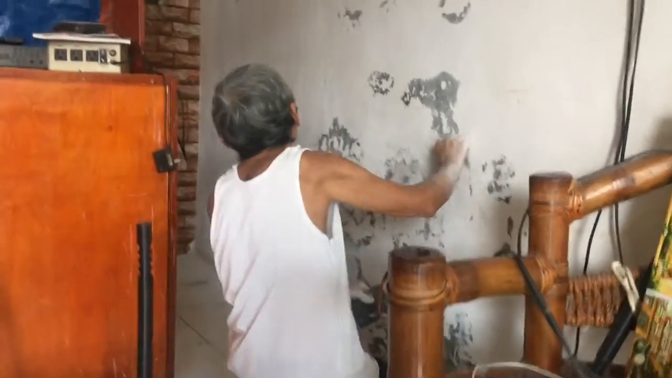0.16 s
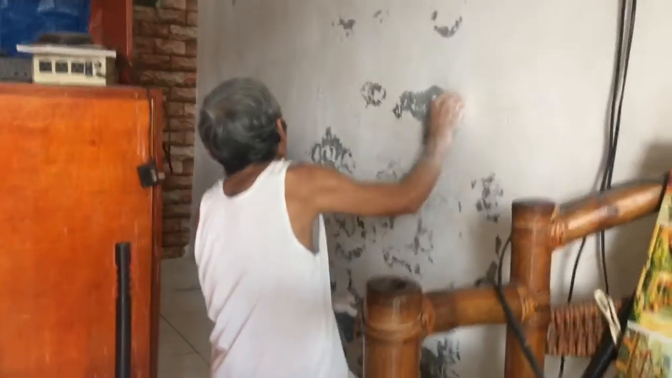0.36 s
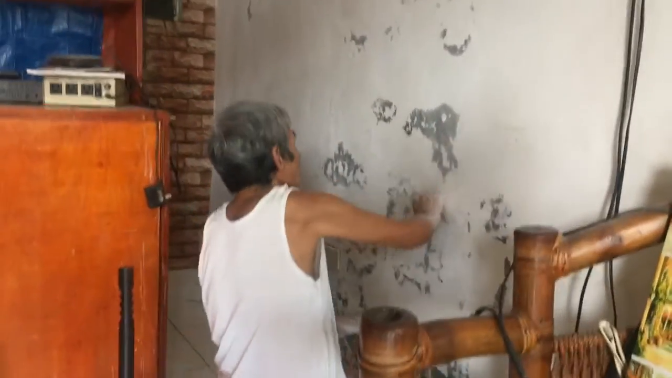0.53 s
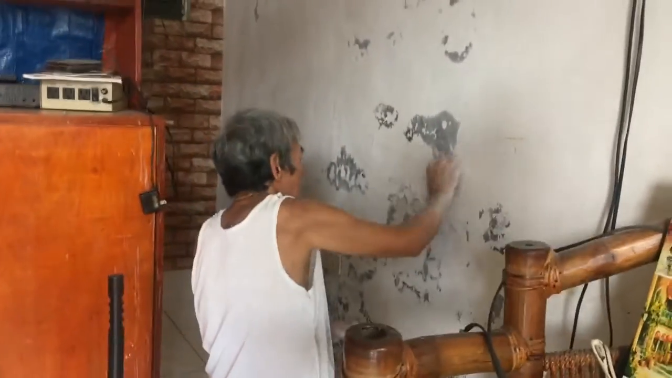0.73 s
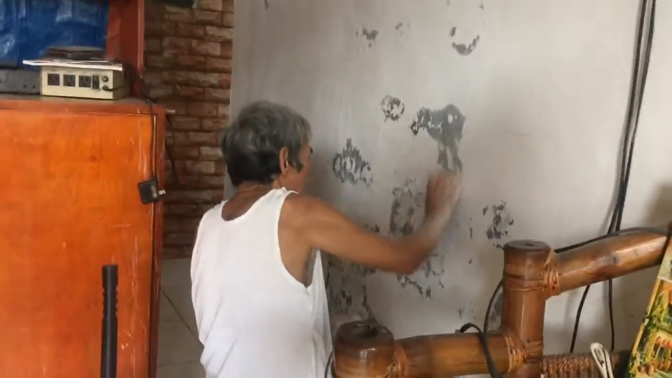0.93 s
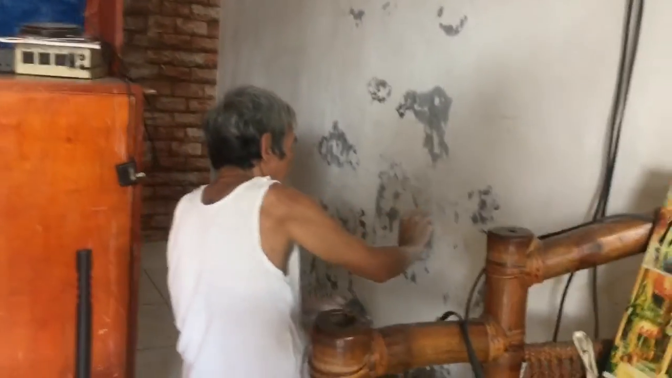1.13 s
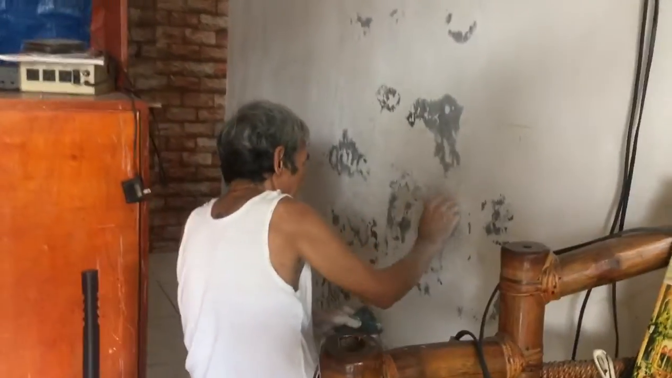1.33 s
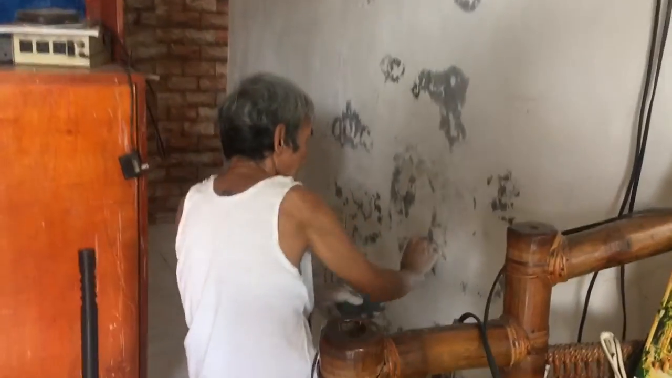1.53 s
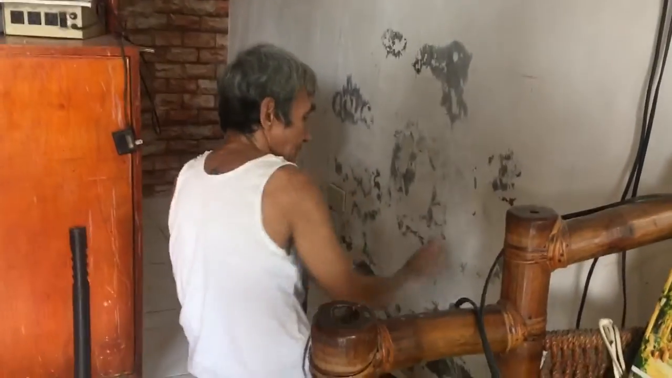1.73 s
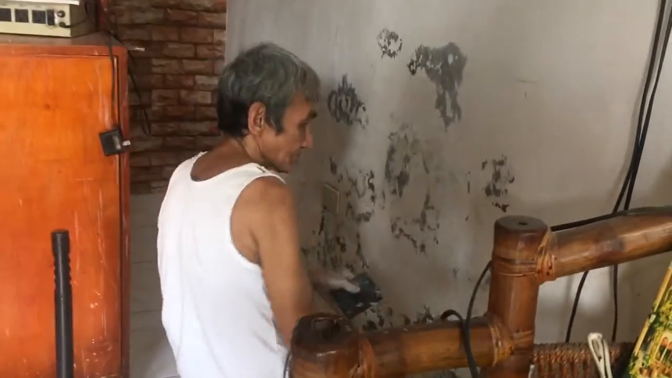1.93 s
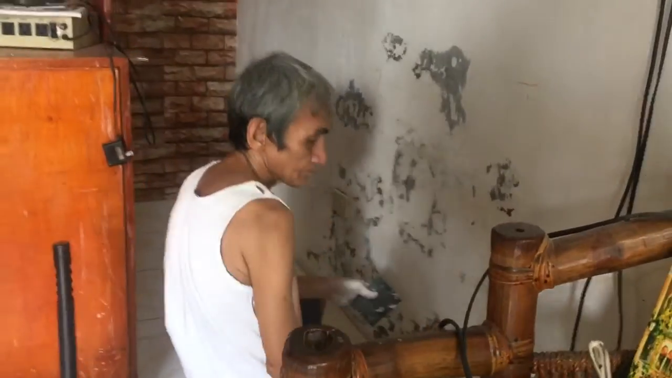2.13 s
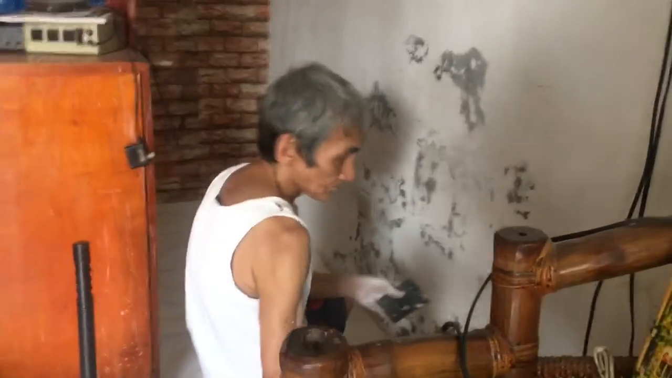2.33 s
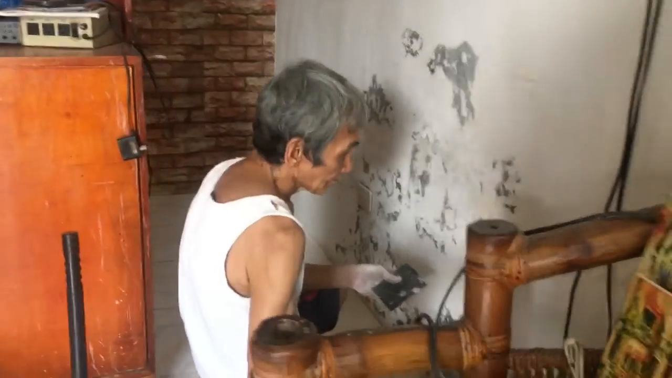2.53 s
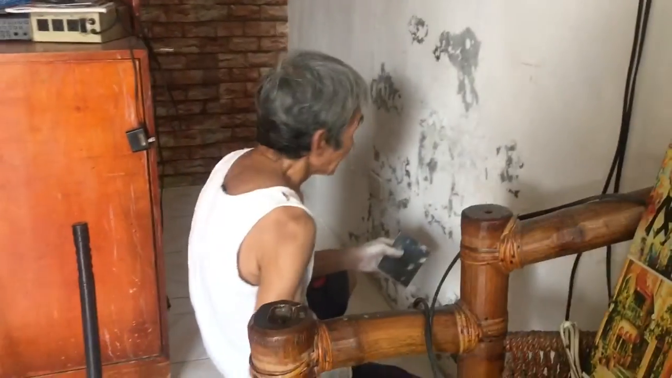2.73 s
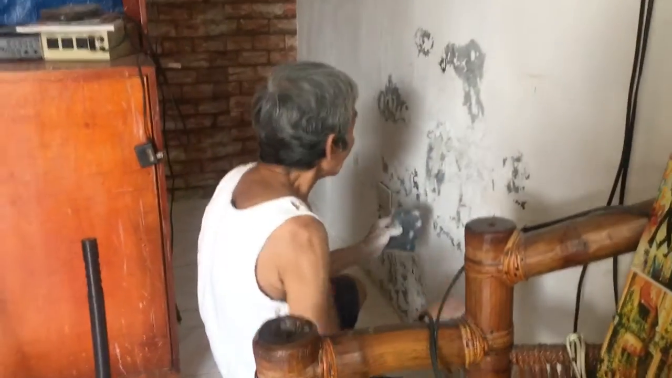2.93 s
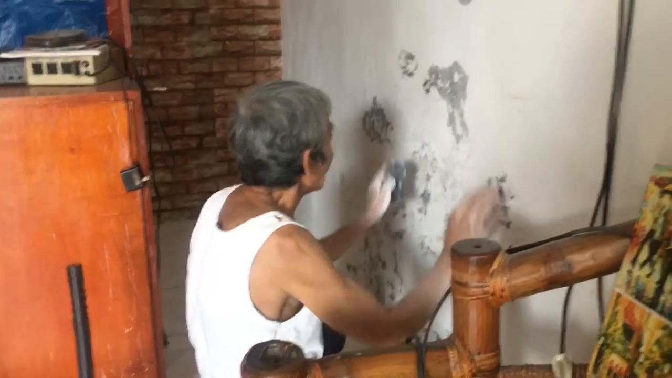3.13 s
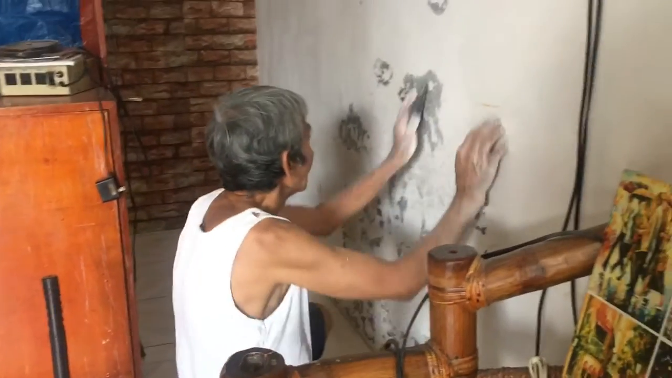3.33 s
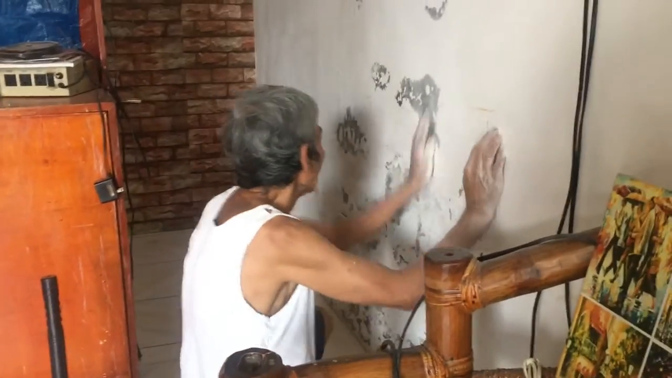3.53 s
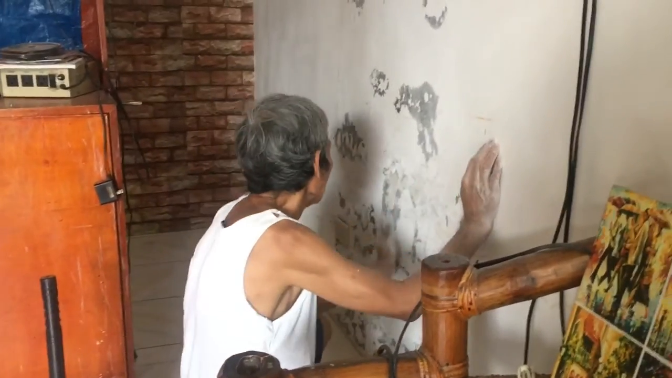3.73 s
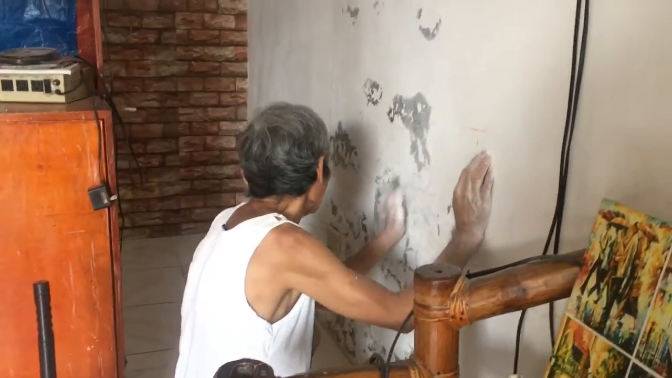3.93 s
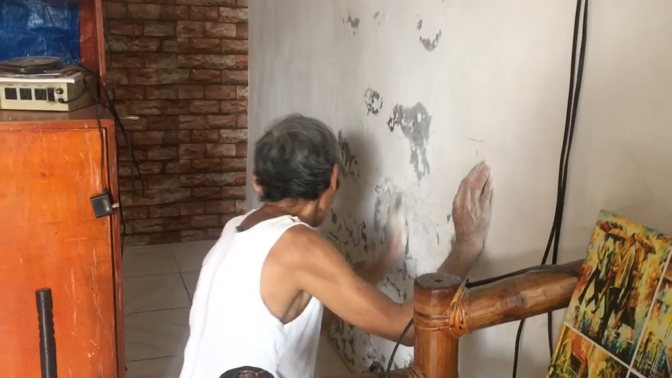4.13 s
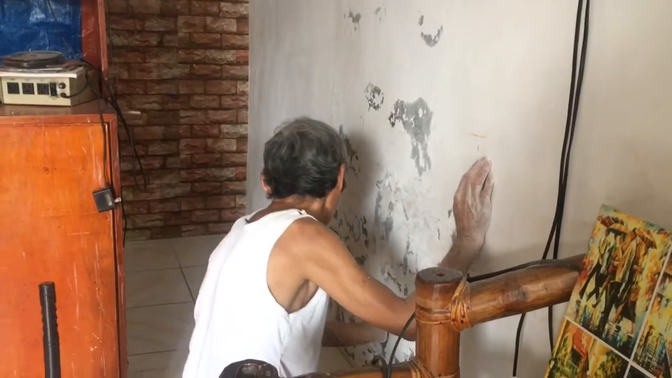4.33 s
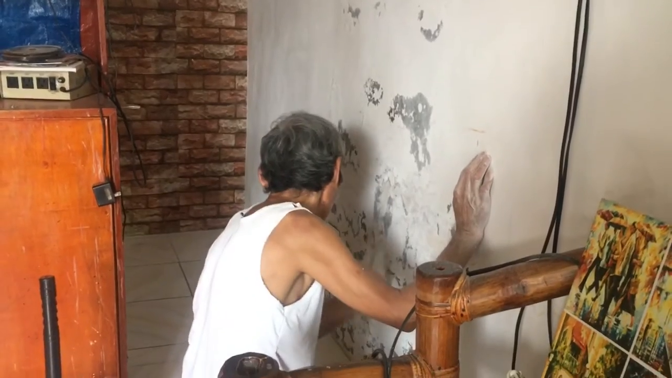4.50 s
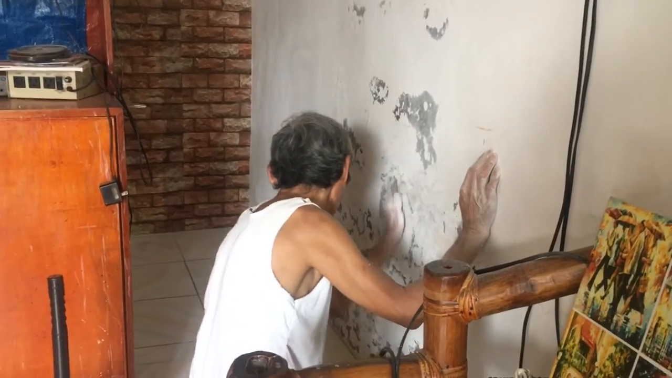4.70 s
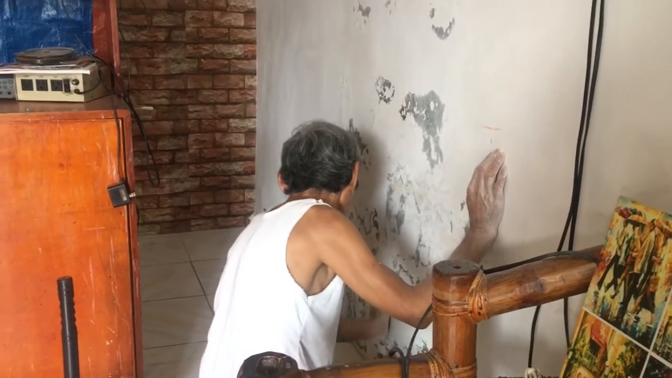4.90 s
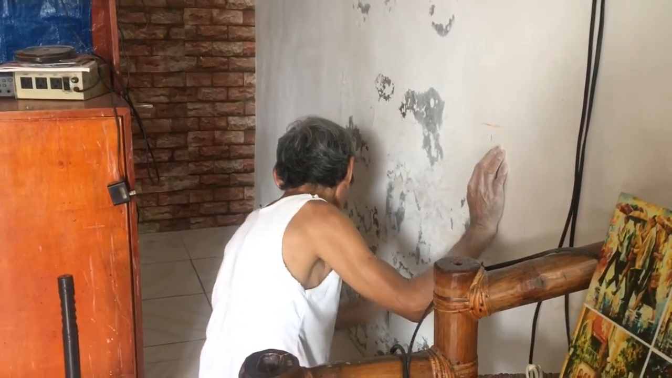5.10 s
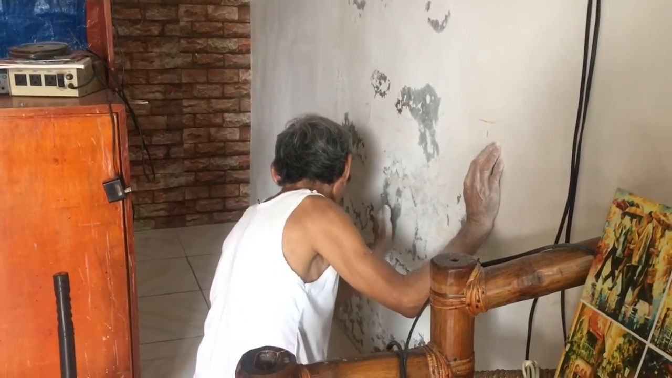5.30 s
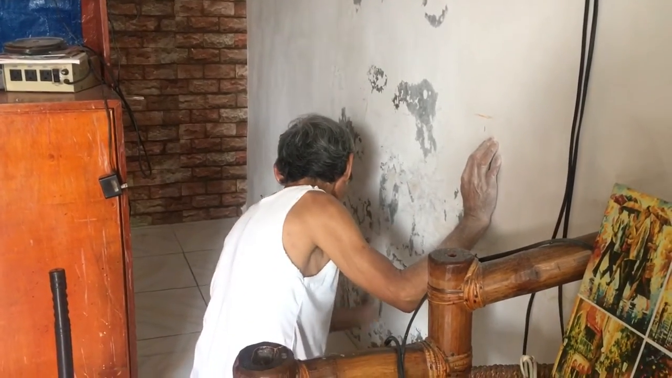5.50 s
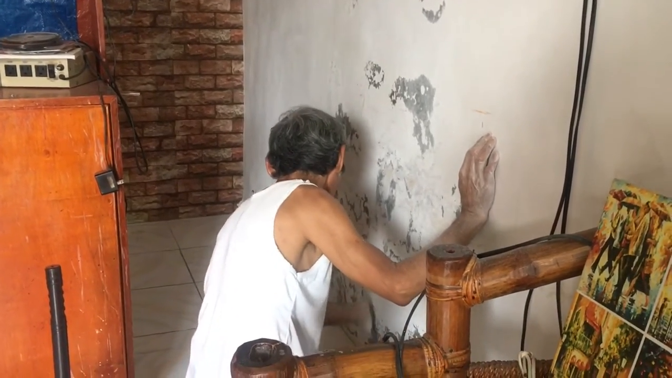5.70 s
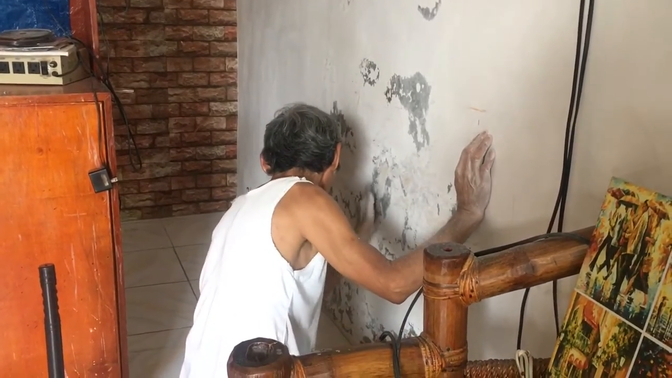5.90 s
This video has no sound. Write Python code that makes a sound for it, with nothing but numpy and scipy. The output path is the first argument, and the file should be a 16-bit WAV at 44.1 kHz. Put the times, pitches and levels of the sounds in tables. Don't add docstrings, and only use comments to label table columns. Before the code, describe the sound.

Short papery scrapes and dry flake snaps come first, with hollow drumming from the wall. After about a second and a half they stop, leaving low street wash and hum, a crinkle, then a metallic clink and scraping jangle. Forceful, hissing back-and-forth sanding follows, close to a mono phone whose gain control ducks slightly, in a lightly reverberant room.

```python
import sys
import numpy as np
from scipy import signal
from scipy.fft import rfft, irfft
from scipy.io import wavfile
from scipy.ndimage import uniform_filter1d

SR = 44100
rng = np.random.default_rng(int(sys.argv[2]) if len(sys.argv) > 2 else 0)


def gain_from_decibels(decibels):
    exponent = np.asarray(decibels, float) / 20
    return 10 ** exponent


def waveform_to_disk(signal):
    frames = np.transpose(np.atleast_2d(signal))
    scaled = np.clip(frames, -1, 1) * 32767
    samples = np.round(scaled).astype(np.int16)
    wavfile.write(sys.argv[1], SR, samples)


N = 262393

# time in seconds, peak in dB, pitch in Hz.
FLAKES = [(0.0082, -16, 2200), (0.0145, -19, 2150), (0.0611, -21, 2200), (0.0907, -18, 2050),
          (0.1371, -19, 2130), (0.1749, -19, 1960), (0.1807, -20, 2240), (0.2222, -20, 2350),
          (0.2503, -22, 2150), (0.2719, -23, 2110), (0.3786, -20, 2220), (0.3837, -19, 2090),
          (0.3897, -14, 1960), (0.4036, -12, 2520), (0.4125, -14, 1940), (0.4376, -13, 2330),
          (0.4430, -12, 2150), (0.4473, -13, 2200), (0.4521, -14, 1900), (0.5092, -17, 1960),
          (0.5141, -14, 2150), (0.5208, -18, 2410), (0.5957, -21, 2220), (0.6233, -21, 2000),
          (0.6433, -23, 2050), (0.7202, -27, 2070), (0.7654, -29, 2000), (0.8651, -19, 1960),
          (0.8689, -20, 2280), (0.8737, -20, 1960), (0.8771, -18, 1920), (0.9500, -16, 2240),
          (0.9638, -17, 2200), (0.9743, -17, 2070), (0.9858, -16, 2090), (0.9999, -13, 2110),
          (1.0117, -16, 2000), (1.0543, -18, 2020), (1.0690, -19, 2390), (1.1641, -18, 2070),
          (1.1800, -18, 2050), (1.1924, -14, 2050), (1.2163, -15, 2300), (1.2234, -16, 1740),
          (1.2368, -16, 2500), (1.2424, -16, 2300), (1.3326, -12, 2180), (1.3395, -16, 2350),
          (1.3469, -16, 2150), (1.3547, -18, 2650), (1.3596, -14, 2240), (1.3789, -16, 2240),
          (1.4017, -15, 2180), (1.4132, -12, 2090), (1.4175, -15, 1850), (1.4229, -14, 2000),
          (1.4300, -15, 2370), (1.4326, -16, 2180), (1.4532, -17, 2130), (1.5044, -21, 1740)]
# frequency in Hz, density in dB per Hz.
WARE_HISS = [(880, -23), (1500, -20), (2340, -15), (2610, -15), (3240, -16), (3500, -20), (4800, -22),
             (5460, -15), (7130, -21), (8340, -21), (10200, -19.5), (12300, -23), (15800, -37)]


def evened(x):
    return x / np.sqrt(np.mean(x ** 2) + 1e-20)


def read(points, hz):
    f, value = np.transpose(points)
    return np.interp(np.log(hz + 1), np.log(f + 1), value)


def coloured(x, points):
    hz = np.fft.rfftfreq(len(x), 1 / SR)
    return evened(irfft(rfft(x) * gain_from_decibels(read(points, hz)), len(x)))


def resonate(x, hz, width_hz):
    turn = np.exp(2j * np.pi * np.cumsum(hz * np.ones(len(x))) / SR)
    r = np.exp(-np.pi * width_hz / SR)
    return 2 * (turn * signal.lfilter([1 - r], [1, -r], x * turn.conj())).real


def twice(x, hz, width_hz):
    return resonate(resonate(x, hz, width_hz), hz, width_hz)


def steep(x, hz, width_hz):
    return resonate(twice(x, hz, 2 * width_hz), hz, 2 * width_hz)


def dipped(x, dips):
    hz = np.fft.rfftfreq(x.shape[-1], 1 / SR)
    cut_db = sum(db / (1 + (2 * (hz - f) / w) ** 2) for f, w, db in dips)
    return irfft(rfft(x) * gain_from_decibels(cut_db), x.shape[-1])


def add(mix, s, sound):
    part = mix[round(s * SR):][:len(sound)]
    part += sound[:len(part)]


def smoothed(x, size, **axis):
    return uniform_filter1d(uniform_filter1d(x, size=size, **axis), size=size, **axis)


def wander(size):
    return evened(smoothed(rng.standard_normal(N), size))


def scratches(per_s, spread_db, clump_db):
    sign, hit, size, bump = rng.random((4, N))
    clumps = evened(smoothed(bump - .5, 200))
    size_db = spread_db * np.minimum(-np.log(size + 1e-9), 5) + clump_db * clumps
    return evened(np.sign(sign - .5) * (hit < per_s / SR) * gain_from_decibels(size_db))


def swells(rows, level_db, rise_steep=0.62, fall_steep=1.):
    edge_db = 20
    rise_curve, fall_curve = 1.88, 1.48
    t = np.arange(0, N + 32, 32) / SR
    s, rise, fall = np.transpose(rows)[:3, :, None]
    drop = rise_steep * (np.maximum(s - t, 0) / rise) ** rise_curve
    drop = drop + fall_steep * (np.maximum(t - s, 0) / fall) ** fall_curve
    db = np.maximum(np.asarray(level_db)[:, None] - edge_db * drop, -150)
    return np.interp(np.arange(N) / SR, t, 10 * np.log10(gain_from_decibels(2 * db).sum(axis=0)))


def street_wash():
    # frequency in Hz, density in dB per Hz.
    wash = [(18, -33), (30, -8), (53, -16), (71, -12), (124, -4), (198, -3.5), (353, -4), (424, -8.5),
            (523, -8), (1060, -7.5), (1240, -7), (1350, -8.5), (1840, -15), (15800, -47.5)]
    # time in seconds, level in dB.
    wash_swell = [
        (0., -0.5),
        (.9, -1.5),
        (1.8, 0),
        (2.6, 0.5),
        (3.3, 0),
        (3.7, 0),
        (4.2, -1),
        (4.7, -0.5),
        (5.2, 0),
        (5.95, 0),
    ]
    level_db = -39
    frames, hz = N // 256 + 5, np.fft.rfftfreq(1024, 1 / SR)
    a, b, patches = rng.standard_normal((frames, 513, 3)).T
    patches = uniform_filter1d(uniform_filter1d(patches, size=8, axis=0), size=16, axis=1)
    z = (a + 1j * b) * gain_from_decibels(read(wash, hz)[:, None] + 1.7 * evened(patches))
    noise = evened(signal.istft(z, nperseg=1024, noverlap=768)[1][:N])
    return gain_from_decibels(level_db + np.interp(np.arange(N) / SR, *np.transpose(wash_swell))) * noise


def hum():
    # frequency in Hz, level in dB rms, width in Hz.
    hum_modes = [(44.6, -54, 19), (67, -53.5, 25), (122.4, -52, 3.3), (222.2, -54, 7.6), (295, -59.5, 1.7)]
    out = np.zeros(N)
    for hz, db, width_hz in hum_modes:
        mode = resonate(resonate(rng.standard_normal(N), hz, width_hz), hz, 2 * width_hz)
        out += gain_from_decibels(db) * evened(mode)
    return out


def rumble():
    # top in seconds, rise in seconds, fall in seconds, level in dB.
    passes = [
        (0., .1, .3, -47),
        (.44, 0.16, .08, -44),
        (1.1, .8, .9, -48.5),
        (2.5, 0.44, .8, -65),
        (3.42, 0.33, 0.22, -43.5),
        (4.1, .8, .5, -53),
        (4.58, 0.2, 0.11, -40),
        (5.15, 0.26, .6, -44),
        (5.85, 0.86, .5, -45),
    ]
    pitch_hz, drift_hz, waver_db = 48.5, 3, 2.5
    turns = np.cumsum(pitch_hz + drift_hz * wander(3000)) / SR
    level_db = swells(passes, np.transpose(passes)[3]) + waver_db * wander(3500)
    return np.sqrt(2) * gain_from_decibels(level_db) * np.sin(2 * np.pi * turns)


def hand():
    # top speed in seconds, rise in seconds, fall in seconds, grit in dB, cupped paper in dB.
    light_pushes = [(0.008, 0.031, 0.042, -36.5, -25), (.04, .03, 0.056, -44, -35),
                    (.095, 0.015, 0.047, -36, -33), (.125, .03, 0.037, -49, -32),
                    (.19, 0.17, 0.15, -33.5, -31), (.38, 0.0033, .05, -27, -26),
                    (.411, 0.025, 0.037, -19, -28), (0.44, 0.013, 0.068, -17.5, -25),
                    (.51, 0.14, 0.11, -30, -28), (.63, 0.084, 0.091, -38, -31),
                    (.76, 0.27, 0.087, -40, -40), (.868, 0.0065, 0.053, -30.5, -28),
                    (.92, 0.064, 0.065, -36, -33.5), (0.969, 0.036, 0.066, -25.5, -27),
                    (1.02, 0.048, 0.13, -37, -27.5), (1.164, .005, .04, -37, -29),
                    (1.22, 0.07, 0.11, -32.5, -25), (1.334, 0.0064, .05, -46, -38),
                    (1.36, 0.022, 0.053, -32, -43), (1.42, 0.12, 0.1, -36, -27),
                    (1.5, 0.13, 0.11, -40.5, -32), (3.325, 0.012, .1, -44, -51),
                    (3.39, 0.047, 0.022, -45, -41.5), (3.419, 0.01, 0.095, -34, -39)]
    hard_pushes = [(3.467, 0.029, 0.23, -17, -23), (3.528, 0.073, 0.11, -11.5, -25.5),
                   (3.67, 0.14, 0.23, -18, -27.5), (3.84, 0.033, 0.11, -23.5, -33),
                   (3.899, 0.085, 0.11, -15, -24), (3.96, 0.072, 0.063, -24, -26),
                   (4.1, 0.049, 0.088, -20, -30), (4.175, 0.1, 0.11, -14.5, -42),
                   (4.29, 0.26, 0.15, -23, -27.5), (4.472, 0.047, 0.19, -21.5, -25),
                   (4.55, 0.076, 0.17, -17.5, -28.5), (4.61, 0.091, 0.038, -25.5, -31),
                   (4.72, 0.045, 0.058, -17, -28.5), (4.76, 0.077, 0.12, -15, -28),
                   (4.879, 0.16, 0.21, -21.5, -24.5), (4.96, 0.29, 0.045, -30.5, -27.5),
                   (5.091, 0.06, 0.11, -24, -24.5), (5.16, 0.14, 0.073, -23.5, -24.5),
                   (5.245, 0.11, 0.079, -20.5, -27.5), (5.346, 0.029, 0.12, -17, -44),
                   (5.44, 0.14, 0.3, -21.5, -26.5), (5.54, 0.13, 0.11, -24.5, -26.5),
                   (5.6, .05, .1, -36, -37.5), (5.7, .04, 0.053, -33.5, -31.5),
                   (5.745, 0.059, 0.12, -21, -26), (5.8, 0.055, .08, -26, -32),
                   (5.86, 0.11, 0.15, -23, -29)]
    # time in seconds, loose paint in dB against the cup, paint pitch in Hz.
    patch = [(0., -9, 1410), (.2, -6.5, 1350), (.42, -1, 1570), (.8, -11.5, 1410), (.95, 1, 1630),
             (1.25, -2.5, 1360), (1.45, -2.5, 1590), (3.38, 1, 1130), (3.43, -2.5, 1480),
             (3.52, -10.5, 1510), (3.62, -6.5, 1590), (3.85, -8, 1680), (4.1, 0.5, 1730),
             (4.3, -11.5, 1580), (4.6, -3.5, 1710), (4.85, -10.5, 1510), (5.1, -7.5, 1440),
             (5.23, -4, 1470), (5.4, -2.5, 1680), (5.55, -8, 1460), (5.7, -6.5, 1510), (5.8, -7, 1420),
             (5.92, -5.5, 1420)]
    # time in seconds, cup pitch in Hz.
    cup_grip = [(0., 2080), (.2, 2180), (.42, 2180), (.88, 2100), (1., 2160), (1.15, 2170), (1.26, 2500),
                (1.35, 2100), (1.58, 2500), (3.35, 2140), (3.47, 2550), (3.62, 2210), (4., 2200),
                (4.5, 2350), (4.75, 2230), (5.1, 2340), (5.22, 2380), (5.35, 2230), (5.47, 2440),
                (5.6, 2340), (5.7, 2300), (5.78, 2380), (5.9, 2270)]
    pushes, t = np.array([*light_pushes, *hard_pushes]), np.arange(N) / SR
    spell = np.digitize(pushes[:, 0], [3, 3.4])
    late = (t >= 3) * 1
    grit_db = swells(pushes, pushes[:, 3])
    cup_db = swells(pushes, pushes[:, 4], 0.73, 1)
    fine_top_db = np.take((-22.5, -17, -18), spell) + 1.09 * (pushes[:, 3] + 20)
    fine_db = swells(pushes, fine_top_db, 0.86, np.take((1.74, 1., 2.1), spell)[:, None])
    over_db = np.clip(grit_db - cup_db, -15, 15) - np.where(late, 7, -4)
    low_db = grit_db + np.take((1.5, 0.5), late) - 0.79 * over_db
    s, loose_db, paint_hz = np.transpose(patch)
    paint_db = cup_db + np.interp(t, s, loose_db) + 0.23 * over_db + 0.6 * wander(1500)
    cup_hz = np.interp(t, *np.transpose(cup_grip)) + 70 * wander(2500)
    paint_hz = np.interp(t, s, paint_hz) + 40 * wander(3000)
    return cup_db, paint_db, low_db, grit_db, fine_db, paint_hz, cup_hz


def sticking():
    stick_s, stick_db = .006, -7
    marks = np.zeros(N)
    marks[np.round(np.transpose(FLAKES)[0] * SR).astype(int)] = 1
    dips = np.convolve(marks, np.hanning(round(2 * stick_s * SR)), "same")
    return gain_from_decibels(stick_db * np.minimum(dips, 1))


def hollow_wall(grit, light):
    # top in seconds, rise in seconds, fall in seconds, level in dB.
    hollow = [
        (.4, 0.046, 0.38, -42),
        (1.02, 0.076, 0.17, -35.5),
        (1.21, 0.053, 0.18, -32.5),
        (1.38, 0.05, 0.25, -33),
        (5.07, 0.044, .2, -38),
        (5.2, 0.22, 0.27, -35),
        (5.55, 0.41, .08, -45),
        (5.83, 0.33, 0.18, -39.5),
    ]
    drum = evened(steep(np.roll(grit, SR), np.where(light, 1000, 850), 590))
    return gain_from_decibels(swells(hollow, np.transpose(hollow)[3])) * drum


def singing_sheet(coarse):
    # top in seconds, rise in seconds, fall in seconds, level in dB, pitch in Hz.
    singing = [(.01, .02, 0.027, -29, 2080), (.125, 0.058, 0.043, -30, 2170),
               (.443, 0.02, 0.027, -29, 2210), (1., 0.037, .05, -37, 2050), (3.46, 0.041, .05, -28, 2540),
               (3.535, 0.033, 0.025, -21, 2590), (3.93, .07, 0.099, -28, 1970),
               (4.28, 0.083, 0.039, -27.5, 2300), (5.11, 0.046, 0.065, -26, 2330),
               (5.47, 0.037, 0.088, -35, 2310), (5.78, 0.065, 0.057, -22.5, 2375)]
    s, _, _, level_db, pitch_hz = np.transpose(singing)
    hz = np.interp(np.arange(N) / SR, s, pitch_hz)
    return gain_from_decibels(swells(singing, level_db)) * evened(twice(np.roll(coarse, -SR // 2), hz, 146))


def sanding():
    # frequency in Hz, density in dB per Hz.
    light_grit = [(1710, -12), (2900, 3.5), (4110, -1), (4600, 0.5), (5050, -3.5), (6430, -7),
                  (7900, -13.5), (8720, -14.5), (10300, -20.5), (12100, -22.5), (15800, -33)]
    hard_grit = [(1710, -37), (2900, -1.5), (3410, 3.5), (4840, 2.5), (5500, 4.5), (6850, 2.5),
                 (9170, -2.5), (10500, -5), (12400, -6.5), (15100, -14), (15800, -15)]
    # factor on the cup pitch, width in Hz, level in dB.
    paper_modes = [(.87, 420, 4), (1., 313, 15), (1.17, 530, -2.5)]
    paper_db, paint_db, low_db, grit_db, fine_db, paint_hz, cup_hz = hand()
    light = np.arange(N) < 3 * SR
    grit = scratches(11000, 0.38, 0.47)
    crumbs = scratches(1500, 2.1, 1.0)
    coarse = grit + np.where(light, .7, .4) * crumbs
    cup_hz = uniform_filter1d(cup_hz, size=900)
    paint_hz = uniform_filter1d(paint_hz, size=900)
    paper = np.zeros(N)
    for k, (factor, width_hz, db) in enumerate(paper_modes):
        paper += (-1) ** k * gain_from_decibels(db) * steep(coarse, cup_hz * factor, width_hz)
    paint = steep(steep(coarse[::-1], paint_hz, 910), paint_hz, 910)

    hiss = np.where(light, coloured(grit + 0.15 * coarse, light_grit), coloured(grit, hard_grit))
    fine = signal.sosfiltfilt(signal.butter(2, 9300, "high", fs=SR, output="sos"), hiss)
    mid = hiss - fine
    mid, fine = (np.where(light, x / x[light].std(), x / x[~light].std()) for x in (mid, fine))
    low = signal.sosfiltfilt(signal.butter(2, 4600, fs=SR, output="sos"), mid)

    stick = sticking()
    out = stick * (evened(paper) * gain_from_decibels(paper_db) + evened(paint) * gain_from_decibels(paint_db + 3.0))
    out += low * gain_from_decibels(low_db) + (mid - low) * gain_from_decibels(grit_db) + fine * gain_from_decibels(fine_db)
    return out + hollow_wall(grit, light) + singing_sheet(coarse)


def flexing(x, patchy_db):
    z = signal.stft(x, nperseg=256, noverlap=192)[2]
    patches = rng.standard_normal(z.shape[::-1]).T
    patches = evened(uniform_filter1d(uniform_filter1d(patches, size=4, axis=0), size=40, axis=1))
    share = np.clip(np.fft.rfftfreq(256, 1 / SR) / 3000, .4, 1)
    return signal.istft(z * gain_from_decibels(patchy_db * patches * share[:, None]), nperseg=256, noverlap=192)[1][:N]


def flakes():
    # time in seconds, peak in dB, pitch in Hz.
    late_flakes = [(3.393, -29, 1210), (3.4427, -17, 2560), (3.455, -8, 2660), (3.478, -8, 2700),
                   (3.484, -17, 1430), (3.536, -17, 2530), (4.4388, -24, 2390), (4.6037, -19, 2260),
                   (5.059, -12, 3500), (5.0724, -16, 2050), (5.093, -10.5, 2400), (5.106, -15, 2450),
                   (5.1202, -11, 2200), (5.128, -14, 2200), (5.1575, -14, 2250), (5.1839, -13, 3350),
                   (5.3104, -19, 2100), (5.5118, -13, 3550), (5.6415, -26, 2650)]
    softness_turns = 1.05
    out, t = np.zeros(N), np.arange(600) / SR
    for s, db, hz in [*FLAKES, *late_flakes]:
        u = t * hz / softness_turns / 2
        swell = u * np.exp(1 - u)
        ring = np.cos(2 * np.pi * hz * t) * swell ** 2
        tick = resonate(rng.standard_normal(600), 5000, 5800) * swell
        add(out, s - 2 * softness_turns / hz, gain_from_decibels(db + 1.5) * (ring + 0.04 * tick))
    return out


def knuckles():
    # time in seconds, peak in dB, pitch in Hz.
    bumps = [
        (1.196, -18, 593),
        (3.58, -8, 1600),
        (3.582, -37, 495),
        (5.04, -26, 810),
    ]
    out, t = np.zeros(N), np.arange(600) / SR
    for s, db, hz in bumps:
        add(out, s, gain_from_decibels(db - 60 * t / 0.013) * np.sin(2 * np.pi * hz * t))
    return out


def rustling():
    # start in seconds, length in seconds, level in dB, centre in Hz, width in Hz.
    rustles = [
        (1.762, 0.12, -57, 7200, 9200),
        (2.175, 0.083, -53.5, 8000, 8900),
        (2.281, 0.12, -39, 2690, 3000),
        (2.3, .08, -62, 7500, 5000),
        (3.14, 0.087, -53, 8000, 9000),
    ]
    out, crinkle = np.zeros(N), scratches(9000, 1.8, 1.0)
    for s, length_s, db, hz, width_hz in rustles:
        part = crinkle[round(s * SR):][:round(length_s * SR)]
        swell = np.sin(np.pi * np.linspace(0, 1, len(part)) ** 0.8) ** 1.5
        add(out, s, gain_from_decibels(db) * swell * evened(twice(part, hz, width_hz)))
    return out


def knocked_ware():
    # frequency in Hz, level in dB, t60 in seconds.
    knock_modes = [(1660, -16, 0.4), (2520, -9, 0.1), (2815, -13, 0.15), (3128, -15, 0.5), (3332, -13, .3),
                   (3510, -18, .3), (3811, -11, 0.25), (4400, -11, .12), (4307, -12, 0.5), (4753, -28, .3),
                   (5173, -13, .5), (5310, -16, .3), (5486, -14, .25), (5954, -18, .2), (6315, -14, .3),
                   (6850, -11, 0.3), (7520, -16, .15), (7795, -13, .12), (8060, -16, .3), (8190, -21, .25),
                   (8306, -16, .4), (9220, -14, .3), (9388, -17, .2), (10750, -28, .2), (11280, -23, .15),
                   (11850, -18, .2), (12620, -15, .14), (13600, -27, .12), (14250, -27, .12),
                   (15050, -20, .12)]
    body_modes = [(224, -18, .9), (400, -18, .12), (606, -14, 0.25), (1120, -4, 0.26), (1160, -16, .1),
                  (1303, -3, 0.12), (1385, -10, 0.08)]
    start_s, level_db, settle_s, settled_db_per_s = 2.4404, -23.5, 0.089, -130
    out, t = np.zeros(N), np.arange(SR // 2) / SR
    body = sum(gain_from_decibels(db - 60 * t / t60) * np.sin(2 * np.pi * hz * t) for hz, db, t60 in body_modes)
    flutter = rng.standard_normal((len(knock_modes), len(t)))
    flutter = evened(uniform_filter1d(flutter, size=250, axis=1))
    ring = np.zeros(len(t))
    for (hz, db, t60), u in zip(knock_modes, flutter):
        ring += gain_from_decibels(db - 60 * t / t60 + u * hz / 3000) * np.sin(2 * np.pi * (hz * t + rng.random()))
    crack = coloured(rng.standard_normal(len(t)), WARE_HISS) * gain_from_decibels(-8.5 - 60 * t / .9)
    crack += resonate(rng.standard_normal(len(t)), 12500, 6000) * gain_from_decibels(-18 - 60 * t / 0.4)
    rest = gain_from_decibels(settled_db_per_s * np.maximum(t - settle_s, 0))
    high = rest * (ring + crack) * np.minimum(t / 0.003, 1)
    add(out, start_s, gain_from_decibels(level_db) * (body * np.minimum(t / 0.001, 1) + high))
    return out


def dragged_ware():
    # time in seconds, level in dB.
    drag = [
        (2.606, -35),
        (2.611, -30.5),
        (2.634, -35),
        (2.66, -35),
        (2.668, -32.5),
        (2.72, -33.5),
        (2.785, -33),
        (2.82, -40.5),
        (2.88, -49),
        (2.96, -70),
    ]
    # frequency in Hz, width in Hz, level in dB at the start, level in dB once tipped.
    ware_modes = [(1720, 25, -12, -19), (2310, 24, -12, -4), (3130, 34, -5, -4), (3320, 28, 1, 2),
                  (3525, 24, -2, -13), (3840, 20, -4, -11), (4270, 40, -12, -8), (4530, 25, -15, -18),
                  (5160, 18, 0, 0), (5310, 50, -8, -3), (5460, 45, -12, -6), (5660, 28, -3, -1),
                  (5920, 38, -3, -13), (6320, 32, -5, -11), (6800, 60, -13, -15), (7250, 30, -17, -20),
                  (7520, 22, -19, -10), (7795, 25, -5, -11), (8170, 35, -6, 0), (8320, 40, -10, -7),
                  (8700, 60, -10, -11), (9220, 45, -11, -15), (9360, 40, -12, -13), (10750, 55, -12, -13),
                  (11400, 70, -14, -14), (11850, 70, -11, -13), (12550, 55, -10, -13),
                  (13250, 40, -19, -20), (13600, 50, -20, -23), (14250, 40, -17, -25),
                  (14700, 50, -14, -18), (15100, 60, -18, -18), (15500, 30, -16, -21), (8060, 30, -10, -6),
                  (11250, 60, -17, -14), (5800, 60, -18, -17)]
    # frequency in Hz, width in Hz, depth in dB.
    ware_dips = [(4900, 200, -9), (13000, 200, -11)]
    tip_s, lift_s, lift_db_per_s = (2.63, 2.69), 2.735, -120
    out = np.zeros(N)
    s, db = np.transpose(drag)
    t = s[0] + np.arange(SR // 2) / SR
    chatter = scratches(12000, 0.59, 0.33)[:len(t)] * gain_from_decibels(np.interp(t, s, db, right=-150))
    lift_db = lift_db_per_s * np.maximum(t - lift_s, 0)
    modes = np.zeros(len(t))
    for hz, width_hz, *tip_db in ware_modes:
        contact = evened(uniform_filter1d(rng.standard_normal(len(t)), size=1500))
        mode_db = np.interp(t, tip_s, tip_db) + 0.8 * contact + lift_db * hz / 16000
        modes += resonate(chatter * gain_from_decibels(mode_db), hz, width_hz)
    level = np.sqrt(np.mean(chatter ** 2))
    rasp = gain_from_decibels(-4.5 + lift_db / 2) * coloured(chatter, WARE_HISS)
    add(out, s[0], level * dipped(gain_from_decibels(4.5) * evened(modes) + rasp, ware_dips))
    return out


def room(x):
    # frequency in Hz, t60 in seconds.
    decay = [(500, 0.94), (1300, 0.72), (3500, 0.66), (9000, 0.55), (15000, 0.53)]
    t, wet = np.arange(N) / SR, np.zeros(N)
    for k in range(3):
        taps = np.zeros(SR)
        at = np.arange(120, SR - 20, 20)
        taps[at + rng.integers(0, 20, len(at))] = rng.choice([-1., 1.], len(at))
        hz, frame_s, z = signal.stft(taps, SR, nperseg=256)
        tail = signal.istft(z * gain_from_decibels(-60 * frame_s / read(decay, hz)[:, None]), SR, nperseg=256)[1]
        share = np.sqrt(2 / 3) * np.cos(2 * np.pi * (1.4 * t + k / 3))
        wet += signal.fftconvolve(x * share, tail / np.linalg.norm(tail))[:N]
    return wet


def scene():
    near = flexing(sanding(), 1.2) + flakes() + knuckles() + rustling()
    near = near + knocked_ware() + dragged_ware()
    background = street_wash() + hum() + rumble()
    mono = gain_from_decibels(-0.5) * near + gain_from_decibels(-7.5) * room(near) + background
    return np.array([mono, mono])


def low_pass(x):
    return signal.sosfilt(signal.butter(12, 15990, fs=SR, output="sos"), x)


def record(dry):
    # frequency in Hz, width in Hz, depth in dB.
    notches = [(4930, 260, -3), (10400, 260, -9.5)]
    full_scale, recovery_db_per_s = .91, 3.1
    hz = np.fft.rfftfreq(N, 1 / SR)
    x = irfft(rfft(dipped(dry, notches)) / np.sqrt(1 + (42 / (hz + 1)) ** 5.8), N)
    power_db = 10 * np.log10(abs(uniform_filter1d(x[0] ** 2, size=2000)) + 1e-12)
    fall_db = np.arange(N) * recovery_db_per_s / SR
    held_db = np.maximum.accumulate(power_db + fall_db) - fall_db
    over_db = np.maximum(held_db + 30.5, 0)
    ducked = x / gain_from_decibels(0.14 * uniform_filter1d(over_db, size=2000))
    clipped = np.clip(ducked, -full_scale, full_scale)
    edge = signal.firwin(401, 15800, window=("kaiser", 9), fs=SR)
    return low_pass(signal.oaconvolve(clipped, edge[None], "same"))


dry = scene()
out = record(dry)
waveform_to_disk(out)
```